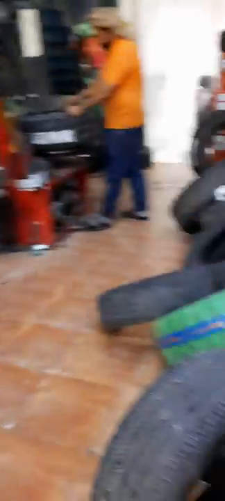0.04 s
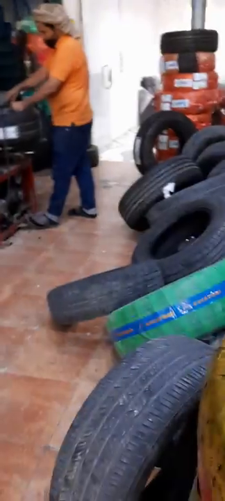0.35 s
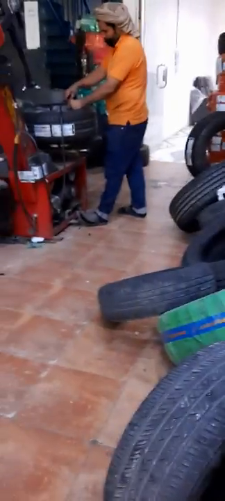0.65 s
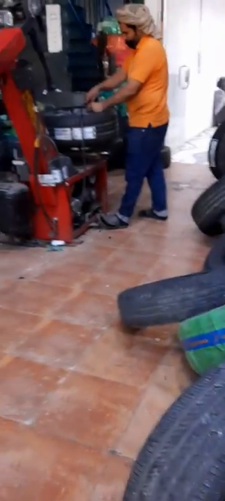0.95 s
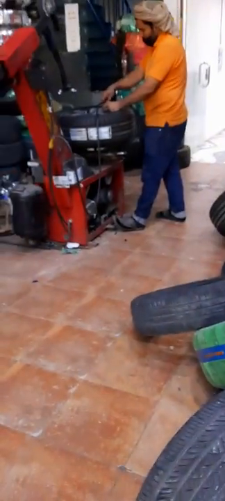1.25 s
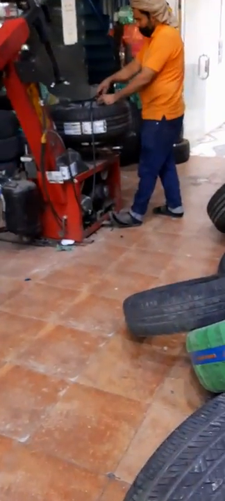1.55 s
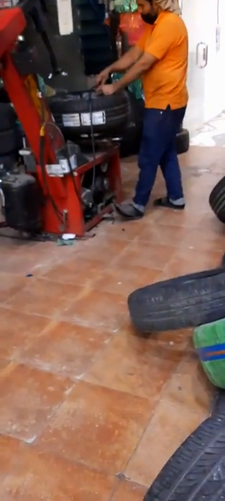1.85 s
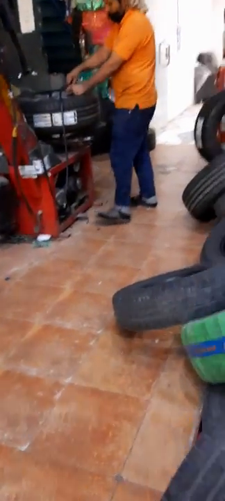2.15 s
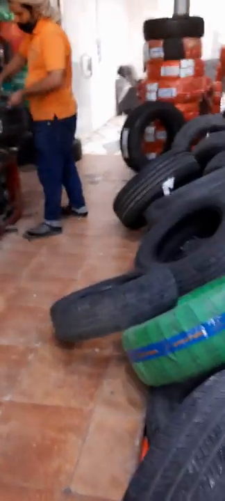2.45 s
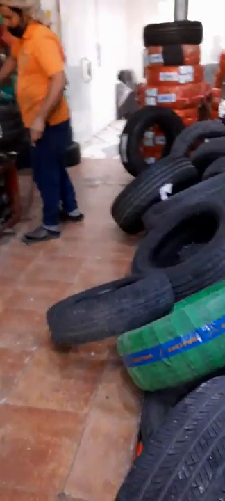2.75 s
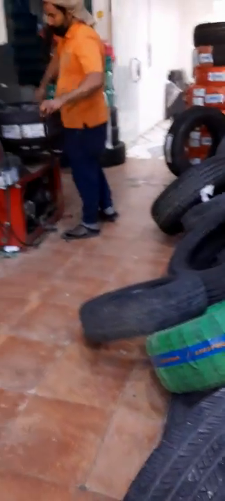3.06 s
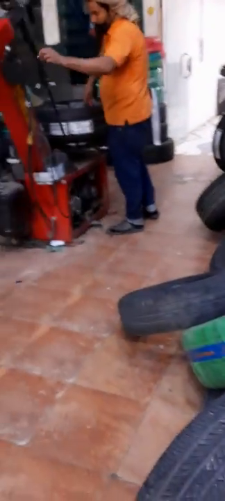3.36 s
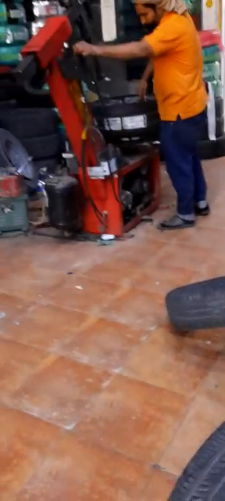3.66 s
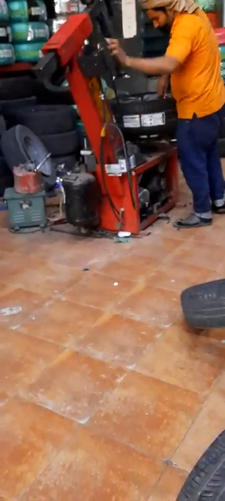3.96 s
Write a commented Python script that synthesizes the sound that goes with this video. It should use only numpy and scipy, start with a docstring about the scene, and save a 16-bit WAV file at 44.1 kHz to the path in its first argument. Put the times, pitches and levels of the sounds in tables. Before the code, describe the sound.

A steel tool clanks repeatedly on a wheel rim over air hiss and machine rumble.

```python
"""A tyre workshop. Machines rumble, air hisses and an engine slowly gathers speed behind everything.
A dull footfall comes first, then something soft bumps down and metal chinks far off. From 1.3 s a steel
tool clanks on a wheel rim about four times a second: each blow rattles, rings the rim and echoes off
the tiled floor and walls. Hollow booms swell under the first blows; later come three dry snaps of steel,
and the work ends in lighter clink-clank pairs."""
import sys
import numpy as np
from scipy import signal
from scipy.fft import rfft, irfft, next_fast_len
from scipy.io import wavfile

SR = 44100
rng = np.random.default_rng(int(sys.argv[2]) if len(sys.argv) > 2 else 0)


def inscribe(sig):
    """Save sig as 16-bit PCM at rate SR to the path in sys.argv[1].

    A 1-D sig is mono; a 2-D sig holds one channel per row.
    Samples are clipped to [-1, 1] before scaling.
    """
    pcm = np.round(np.clip(np.atleast_2d(sig).T, -1, 1) * 32767)
    wavfile.write(sys.argv[1], SR, pcm.astype(np.int16))


N = 176400

# Tool blows on the rim: t/s, knock/dB, clank/dB, clash/dB, sizzle/dB, relative ring/dB,
# ring tilt/(dB per octave), rebound delay/s, rebound/dB, decay stretch/ratio
BLOWS = [(1.324, -31, -22.5, -26.5, -26.5, -42, 9, 0.0064, -21, 0.97),
         (1.379, -47, -27, -37, -45, -47, 0, 0.0086, -7, 1.2),
         (1.409, -27.5, -13, -29.5, -36, -38, -6, 0.001, -8.5, 0.82),
         (1.683, -15.5, -11.5, -13.5, -21.5, -17.5, -6, 0.0082, -4.5, 0.84),
         (1.939, -26.5, -11.5, -12, -22, -19, -5, 0.018, -12, 0.92),
         (2.178, -17.5, -14.5, -14, -26, -18.5, -1, 0.011, -4, 0.89),
         (2.411, -22, -15.5, -15.5, -26.5, -22, -11.5, 0.0059, -1, 0.94),
         (2.616, -51, -26, -17, -24.5, -16.5, 7, 0.004, -9, 0.97),
         (2.659, -26, -13.5, -17, -27, -20, -9.5, 0.012, 0, 0.61),
         (2.706, -27, -24, -23, -40, -23.5, 1.5, 0.0066, -3.5, 0.95),
         (2.909, -21, -13.5, -13.5, -19.5, -17, -1, 0.0162, -1.5, 0.72),
         (3.156, -34, -19, -23, -33, -27, -2.5, .02, 3, 1.15),
         (3.343, -40, -26.5, -22, -27, -20, 2, 0.022, -5.5, 1.02),
         (3.409, -36, -18.5, -22, -31.5, -45, -7, 0.0076, 2, 0.84),
         (3.572, -55, -33, -23, -34, -21, 5.5, 0.005, -4.5, 0.95),
         (3.648, -40, -18.5, -22, -30, -29, -7, 0.016, 2, 0.82),
         (3.768, -55, -20, -16, -41, -15, 0.5, 0.0053, -21, 0.76),
         (3.864, -58, -32, -23.5, -26.5, -21.5, 8.5, 0.0032, -6, 0.69),
         (3.929, -39, -19, -19.5, -28.5, -24.5, -2, 0.014, -1.5, 0.87)]
# The rim's modes: f/Hz
RIM_HZ = [2686, 2979, 3483, 3942, 4454, 5012, 5627, 6270, 6956, 7694, 8428, 9260, 10040, 10933, 11860,
          12810, 13751]
RING_ATTACK_S, ROOM_BUILD_S = 0.0046, 0.0098
PORT_LAG_S = 0.00013  # direct sound reaches the left microphone port first


def undb(db):
    """Decibels to gain."""
    return 10 ** (np.asarray(db) / 20)


def curve(table, column=1):
    """A column of a timed table at every sample."""
    rows = np.array(table, float)
    return np.interp(np.arange(N) / SR, rows[:, 0], rows[:, column])


def response(points, hz):
    """EQ gain through points of f/Hz, level/dB, falling 20 dB an octave beyond both ends."""
    f, db = np.array(points, float).T
    octave = np.log2(np.maximum(hz, 1))
    beyond = np.abs(octave - np.clip(octave, np.log2(f[0]), np.log2(f[-1])))
    return undb(np.interp(octave, np.log2(f), db) - 20 * beyond)


def noise(eq, likeness, lag=0, resonance=1):
    """Coloured stereo noise of rms 1, wide at likeness 0; the shared part lags on the right."""
    hz = np.arange(N // 2 + 1) * SR / N
    white = rng.standard_normal((3, len(hz))) + 1j * rng.standard_normal((3, len(hz)))
    shared = white[2] * np.exp(-2j * np.pi * hz * np.array([[0], [lag]]))
    stereo = np.sqrt(likeness) * shared + np.sqrt(1 - likeness) * white[:2]
    x = irfft(stereo * response(eq, hz) * resonance, N)
    return x / x.std()


def walk(rate_hz):
    """Smooth random drift with a spread near 1."""
    steps = rng.standard_normal(4096)
    return np.sqrt(3 / 2) * np.interp(np.arange(N) * rate_hz / SR, np.arange(len(steps)), steps)


def tone(hz, blur_hz):
    """A ringing mode whose strength and phase waver."""
    turn = 2 * np.pi * hz * np.arange(N) / SR
    return np.sin(turn) + (walk(blur_hz) * np.sin(turn) + walk(blur_hz) * np.cos(turn)) / 2


def fade(attack, t60):
    """Envelope of one contact: quick rise, exponential fall."""
    t = np.arange(int((t60 + attack) * SR)) / SR
    return (1 - np.exp(-2 * t / attack)) * np.exp(-np.log(1000) * t / t60)


def strike(start, attack, t60):
    """One contact envelope placed on the timeline."""
    return np.pad(fade(attack, t60), (int(start * SR), N))[:N]


def background():
    """The bed: machine rumble and roar, a wash of room noise and a smooth hiss of air."""
    # Fader moves: t/s, rumble/dB, roar/dB, wash/dB, hiss/dB
    faders = [(0, -51, -50, -53, -50.5), (.62, -54, -52.5, -54, -53), (.85, -44.5, -44.5, -49, -47),
              (1.1, -41.5, -40, -44, -43.5), (1.36, -41, -38, -40.5, -40.5), (1.5, -31.5, -33, -39.5, -41),
              (1.87, -42, -36, -42, -42), (2.07, -33, -36, -41.5, -45.5), (2.35, -39.5, -37, -40.5, -46),
              (2.8, -35, -37, -37.5, -45), (3.06, -43.5, -40, -39, -43), (3.3, -46, -38, -38, -54),
              (4, -43, -39, -46, -52)]
    # EQ of each layer: f/Hz, level/dB
    rumble_eq = [(22, -30), (36, -25), (50, 3), (75, 1.5), (110, -3), (170, -10), (260, -7), (500, -29)]
    roar_eq = [(90, -14), (160, -4), (230, -5), (320, 0), (400, -7.5), (520, -10.5), (750, -18.5),
               (1500, -30)]
    wash_eq = [(300, -6), (600, 4), (1100, 3.5), (1800, 0), (2600, -7), (4500, -18), (8000, -13.5),
               (15000, -26)]
    hiss_eq = [(1500, -23), (4000, -0.5), (7000, -4.5), (10000, -4.5), (13300, 3), (15000, 3.5),
               (16000, -7.5)]
    rumble = noise(rumble_eq, likeness=0.99) * undb(curve(faders, 1) + 1.5 * walk(15))
    roar = noise(roar_eq, likeness=0.94) * undb(curve(faders, 2) + walk(18))
    wash = noise(wash_eq, likeness=0.081) * undb(curve(faders, 3))
    hiss = noise(hiss_eq, likeness=0.035) * undb(curve(faders, 4))
    return rumble + roar + wash + hiss


def engine():
    """The low, uneven firing tone of an engine gathering speed."""
    # Firing rate: t/s, f/Hz
    speed = [(0, 97), (.9, 97), (1.5, 106.3), (2.5, 120.1), (4, 139)]
    # Fader of the firing tone: t/s, level/dB
    fader = [(0, -64), (.75, -55), (1.1, -36), (1.35, -40), (1.62, -30), (1.85, -37), (2.7, -40.5),
             (3.2, -46), (4, -49.5)]
    firing_hz = curve(speed) * (1 + 0.0061 * walk(22.2))
    turn = 2 * np.pi * np.cumsum(firing_hz) / SR
    return np.sqrt(2) * undb(curve(fader) + 1.6 * walk(13)) * np.sin(turn)


def footfall():
    """One dull step: a low, quickly damped thump."""
    thump = np.sin(2 * np.pi * 108.4 * np.arange(N) / SR)
    return undb(-29) * strike(0.088, attack=0.012, t60=0.15) * thump


def bumps():
    """Something soft lands, scuffs and settles."""
    # Landings: t/s, body/dB, t60/s, scuff/dB
    landings = [(.274, -35, 0.26, -44.5), (0.3, -34.5, 0.27, -42), (0.334, -35.5, 0.54, -53)]
    # EQ of the dull body and the scuff: f/Hz, level/dB
    body_eq = [(60, -11), (130, -15), (195, -1.5), (255, -22), (345, 1), (400, 0.5), (540, -23), (900, -53)]
    scuff_eq = [(400, -17), (1000, 5), (1700, -1.5), (2400, -10), (5000, -21)]
    body = sum(undb(db) * strike(start, 0.0031, t60) for start, db, t60, _ in landings)
    scuff = sum(undb(db) * strike(start, 0.017, t60) for start, _, t60, db in landings)
    return body * noise(body_eq, likeness=0.96) + scuff * noise(scuff_eq, likeness=0.24)


def chink():
    """A faint, distant touch of metal."""
    # One narrow, bright band: f/Hz, level/dB
    eq = [(2100, -14), (2550, 7), (2950, -6), (3400, -18)]
    return undb(-52) * strike(0.427, attack=0.0022, t60=0.11) * noise(eq, likeness=0.71)


def blows(levels_db, attack, t60):
    """Joint envelope of all blows, each with its rebound and its own stretch of the decay."""
    power = np.zeros(N)
    for (start, *_, delay, rebound_db, stretch), db in zip(BLOWS, levels_db):
        hit = (undb(db) * fade(attack, t60 * stretch)) ** 2
        for at, gain in ((start, 1), (start + delay, undb(rebound_db))):
            part = power[int(at * SR):][:len(hit)]
            part += gain ** 2 * hit[:len(part)]
    return np.sqrt(power)


def steel():
    """Resonant EQ of the steel: hollow peaks plus a gentle lift at each rim mode."""
    # Hollow resonances of tool and wheel: f/Hz, width/Hz, lift/dB
    hollows = [(1010, 100, 4), (1290, 350, 8.5), (1496, 160, 12), (1634, 64, 11), (1836, 100, 8.5),
               (3070, 78, 5.5), (4980, 72, 1)]
    rim_width_hz, rim_lift_db = 280, 2.5
    hz = np.arange(N // 2 + 1) * SR / N
    peaks = hollows + [(centre, rim_width_hz, rim_lift_db) for centre in RIM_HZ]
    lift = sum((undb(db) ** 2 - 1) / (1 + (2 * (hz - centre) / width) ** 2)
               for centre, width, db in peaks)
    return np.sqrt(1 + lift)


def contact_colour(x):
    """Each blow lands elsewhere, so it gets its own random peaks and notches."""
    ripple_db, span_s = 3, 0.0043
    taps = int(span_s * SR)
    edges = [int(row[0] * SR) for row in BLOWS] + [N]
    out = np.zeros((2, 2 * N))
    for start, end in zip(edges, edges[1:]):
        size = next_fast_len(end - start + SR // 10)
        echoes = rng.standard_normal(SR // 10)[:taps] * np.sqrt(2 / taps)
        gain = undb(ripple_db * rfft(echoes - echoes.mean(), size))
        gain /= np.sqrt(np.mean(np.abs(gain) ** 2))
        out[:, start:start + size] += irfft(rfft(x[:, start:end], size) * gain, size)
    return out[:, :N]


def clanks():
    """Dense, quickly damped steel resonances rattle at each blow; the room answers diffusely."""
    # The rattle's four bands, low to high: f/Hz, level/dB
    knock = [(250, 1.5), (370, -1), (440, 14), (490, -9), (600, -4.5), (800, -36)]
    clank = [(450, -21), (780, -10), (1040, -0.5), (1300, -2.5), (1700, -5), (2100, 0.5), (3000, -35)]
    clash = [(1400, -26), (2100, -4.5), (2350, -1.5), (2750, -0.5), (3300, -1.5), (3900, -1), (4700, -5.5),
             (5500, 0), (6100, -10.5), (7500, -8.5), (10000, -45)]
    sizzle = [(4500, -76), (7200, 0), (8200, 0), (9200, 1), (10300, -0.5), (11200, -0.5), (13000, 3),
              (15800, -3.5)]
    # Envelope per band: attack/s, base t60/s, base room t60/s, room send/dB
    envelopes = [(0.013, 0.19, 0.44, -9.5), (0.0021, 0.07, 0.51, -12.5), (0.0054, 0.14, 0.58, -7.5),
                 (0.0078, 0.18, 0.5, -8)]
    # Left-right likeness per band: direct/0-1, room/0-1
    likeness = [(1, 0.98), (0.24, 0.18), (0.45, 0.01), (0, 0.13)]
    levels = np.array(BLOWS).T[1:5]
    bands = zip((knock, clank, clash, sizzle), levels, envelopes, likeness)
    out, body = 0, steel()
    for eq, db, (attack, t60, room_t60, send_db), (near, far) in bands:
        direct = noise(eq, near, PORT_LAG_S, body) * blows(db, attack, t60)
        room = noise(eq, far, resonance=body) * blows(db + send_db, ROOM_BUILD_S, room_t60)
        out = out + direct + room
    return contact_colour(out)


def rim_ring():
    """The rim's modes ring on, blurred by reflections; each blow rings with its own brightness."""
    # One row per mode of RIM_HZ: relative level/dB, base t60/s
    modes = [(-9, 0.38), (-8, 0.34), (-9, 0.28), (-3.5, 0.27), (-14, 0.3), (-6.5, 0.31), (-4, 0.35),
             (-5.5, 0.2), (-10, 0.25), (-12.5, 0.4), (-13, 0.33), (-12, 0.3), (-19, 0.26), (-13.5, 0.33),
             (-19, 0.28), (-19, .27), (-17.5, 0.3)]
    pivot_hz, blur_depth, blur_hz = 5400, 0.9, 74.84
    scatter_db, detune_hz = 2, 15  # each blow lands elsewhere, so its ring differs
    starts, *_, ring_db, tilt = np.array(BLOWS).T[:7]
    blows_so_far = np.searchsorted(starts, np.arange(N) / SR)
    out = np.zeros((2, N))
    for hz, (db, t60) in zip(RIM_HZ, modes):
        scatter = scatter_db * rng.standard_normal(len(BLOWS))
        levels = ring_db + db + tilt * np.log2(hz / pivot_hz) + scatter
        envelope = blows(levels, RING_ATTACK_S, t60)
        detune = detune_hz * rng.standard_normal(len(BLOWS) + 1)
        turn = 2 * np.pi * np.cumsum(hz + detune[blows_so_far]) / SR
        for port, lag in enumerate((0, 2 * np.pi * hz * PORT_LAG_S)):
            reflections = walk(blur_hz) * np.sin(turn) + walk(blur_hz) * np.cos(turn)
            out[port] += envelope * (np.sin(turn - lag) + blur_depth * reflections)
    return out / 2


def tool_clink():
    """The tool clinks with its own few modes as it is set on the wheel."""
    # The tool's modes: f/Hz, level/dB, t60/s
    modes = [(454, -23, 0.11), (4240, -26, 0.072), (7870, -37, 0.31), (11500, -33, 0.19), (13900, -38, .15)]
    out = 0
    for hz, db, t60 in modes:
        stereo_ring = np.array([tone(hz, blur_hz=111.8) for _ in range(2)])
        out = out + undb(db) * strike(1.326, RING_ATTACK_S, t60) * stereo_ring
    return out


def booms():
    """Low, hollow resonances of the machine and tyre swell and fade between the first blows."""
    # Boom cues: t/s, f/Hz, level/dB
    cues = [(1.495, 275, -26), (1.745, 325, -23), (1.96, 278, -26.5), (2.05, 337, -24), (2.07, 183.6, -29)]
    return sum(undb(db) * strike(start, attack=0.031, t60=0.36) * tone(hz, blur_hz=80.1)
               for start, hz, db in cues)


def snaps():
    """Short, bright clicks of steel on steel that leave the rim still, with a faint room tail."""
    # Snap cues: t/s, level/dB
    cues = [(2.52, -27.5), (3.1125, -15), (3.185, -18.5)]
    # EQ of the click: f/Hz, level/dB
    eq = [(1200, -6), (2500, -1.5), (4600, -2.5), (5300, 2), (5700, -1), (6200, 6.5), (7000, -4),
          (10500, -4.5), (14500, -30)]
    send_db = -8.5
    direct = sum(undb(db) * strike(start, attack=0.0015, t60=0.049) for start, db in cues)
    room = sum(undb(db + send_db) * strike(start, ROOM_BUILD_S, t60=0.22) for start, db in cues)
    return direct * noise(eq, likeness=1, lag=PORT_LAG_S) + room * noise(eq, likeness=0.13)


def scene():
    """The workshop mix; the level dips briefly after the last heavy blow."""
    wheel_work = clanks() + rim_ring() + tool_clink() + booms() + snaps()
    dip = undb(-8 * strike(2.992, attack=0.0021, t60=0.22))
    return (wheel_work + footfall() + bumps() + chink() + engine() + background()) * dip


def record(dry):
    """The two microphone ports colour the treble differently; a steep low-pass cuts the top."""
    # Stereo balance: f/Hz, left minus right/dB
    balance = [(100, 0.5), (1300, -1), (2200, 0), (4000, -1), (6000, -4.5), (8000, 1.5), (10200, 8),
               (12000, 8), (15000, 2.5)]
    top_hz = 15900
    hz, db = np.array(balance, float).T
    bin_hz = np.arange(N // 2 + 1) * SR / N
    tilt = np.interp(np.log(bin_hz + 1), np.log(hz), db)
    heard = irfft(rfft(dry) * undb(np.array([tilt, -tilt]) / 2), N)
    return signal.sosfilt(signal.ellip(10, 0.2, 80, top_hz, fs=SR, output="sos"), heard)


dry = scene()
out = record(dry)
inscribe(out)
```